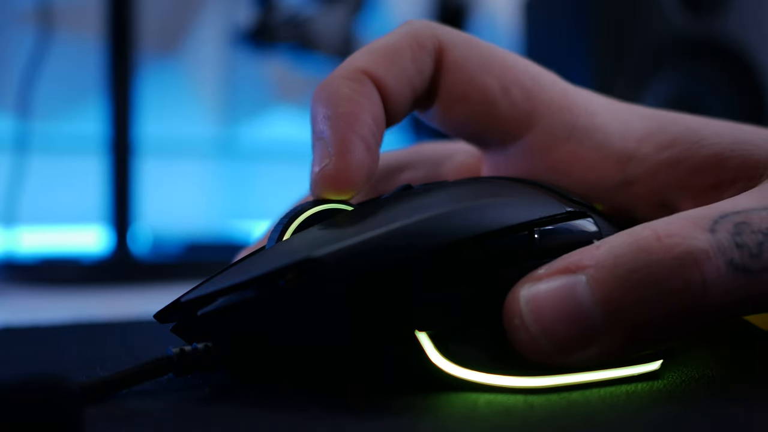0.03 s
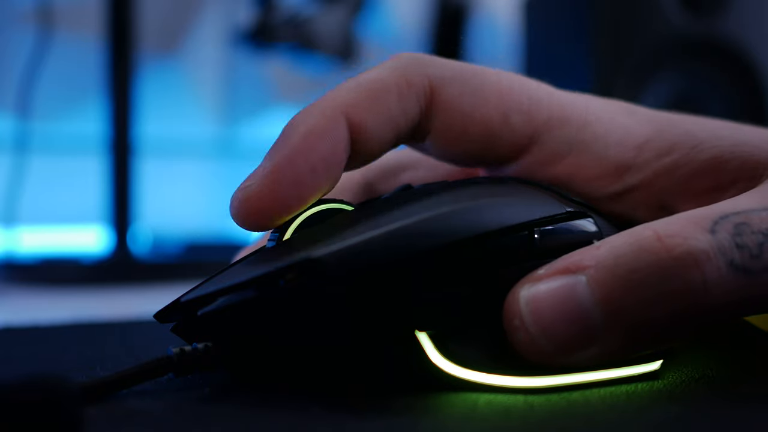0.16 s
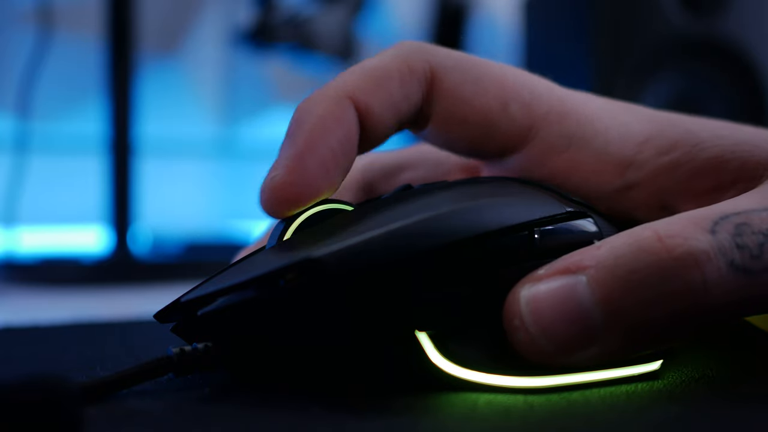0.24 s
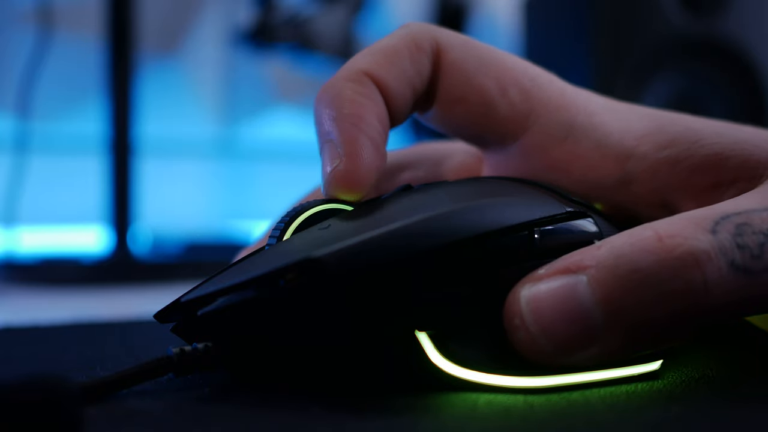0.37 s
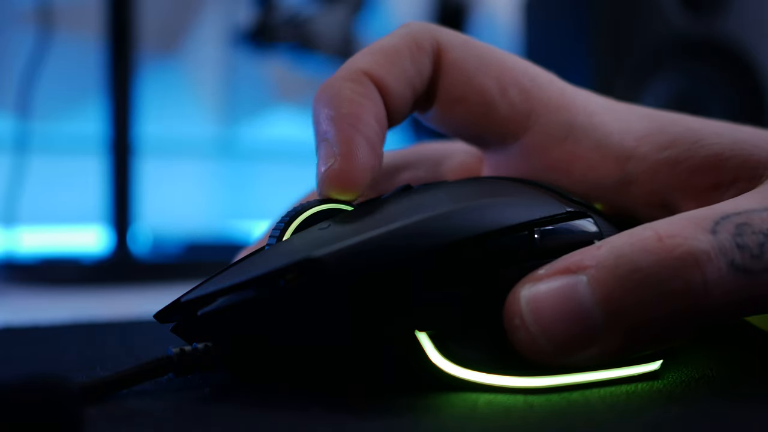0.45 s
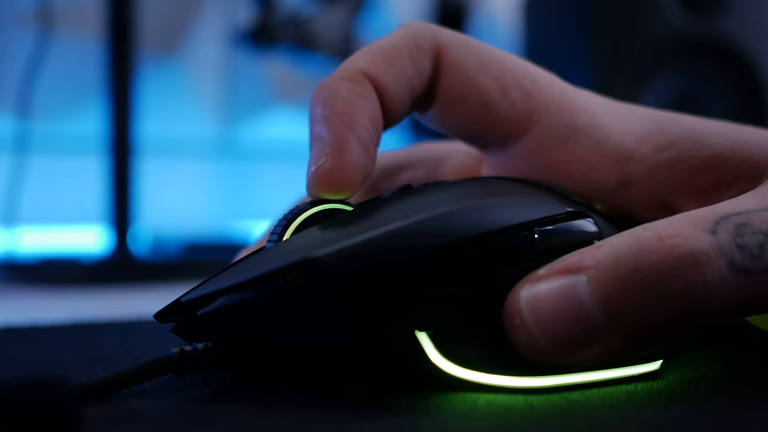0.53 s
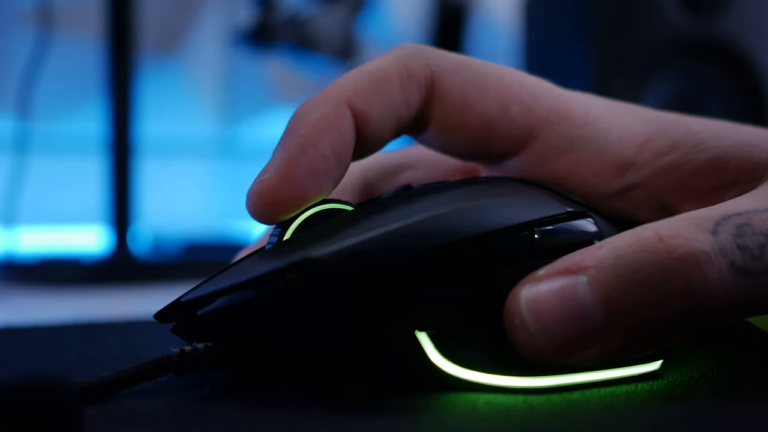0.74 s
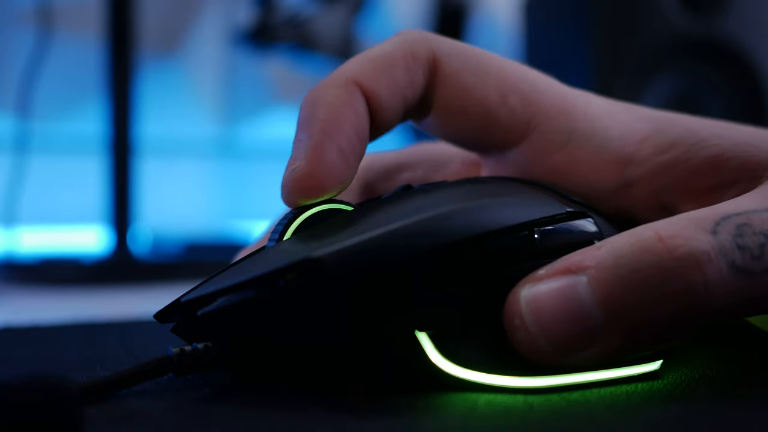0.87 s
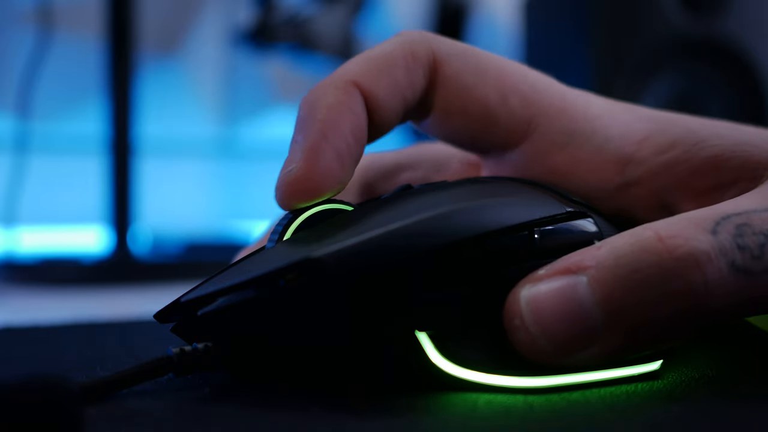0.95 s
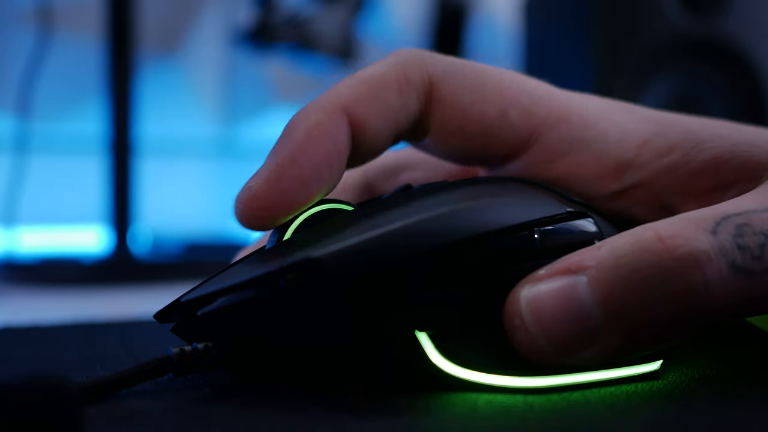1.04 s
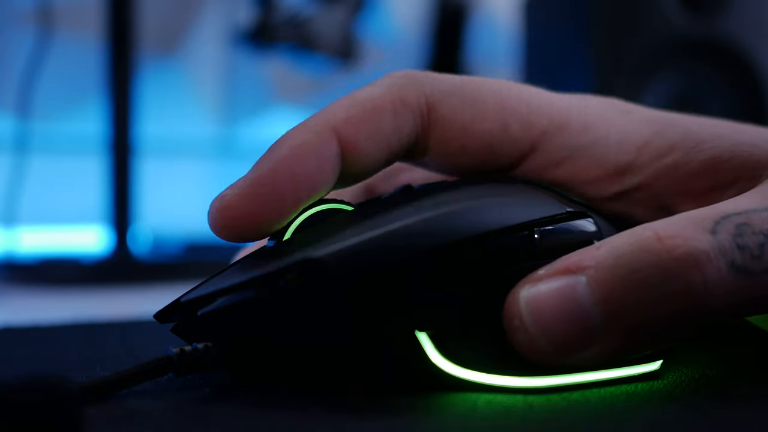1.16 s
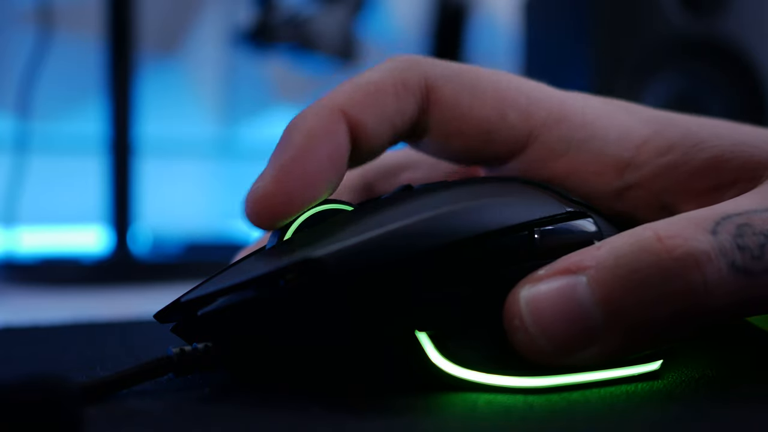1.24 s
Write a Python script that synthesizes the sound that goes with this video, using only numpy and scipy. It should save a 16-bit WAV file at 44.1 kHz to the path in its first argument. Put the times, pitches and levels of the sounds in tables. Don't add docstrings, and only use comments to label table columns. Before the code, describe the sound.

A computer mouse scroll wheel ticks softly, then snaps in one sharp bright click over faint hum

```python
import sys
import numpy as np
from scipy import signal
from scipy.fft import rfft, irfft
from scipy.io import wavfile
from scipy.ndimage import uniform_filter1d

SR = 44100
rng = np.random.default_rng(int(sys.argv[2]) if len(sys.argv) > 2 else 0)


def materialize(psi):
    bounded = np.clip(np.atleast_2d(psi).T, -1, 1)
    quanta = np.round(bounded * 32767).astype(np.int16)
    wavfile.write(sys.argv[1], SR, quanta)


def decibels_to_gain(level_db):
    exponent = np.asarray(level_db, float) / 20
    return 10 ** exponent


N = 57330


def unit(x):
    return x / np.sqrt(np.mean(x ** 2))


def bandpass(x, order, low_hz, high_hz):
    return signal.lfilter(*signal.butter(order, [low_hz, high_hz], "band", fs=SR), x)


def walk(rate_hz):
    k = int(SR / rate_hz)
    return unit(uniform_filter1d(uniform_filter1d(rng.standard_normal(N), k), k))


# frequency_hz, density_db
AIR_SPECTRUM = [(15, -18), (25, -5.5), (212, -3), (2050, -22), (3520, -26.5), (4370, -27), (5000, -27),
                (12900, -28.5), (16000, -31.5)]
AIR_DB = -53


def air():
    hz = np.fft.rfftfreq(N, 1 / SR)
    curve_hz, curve_db = np.array(AIR_SPECTRUM).T
    gain = decibels_to_gain(np.interp(np.log(hz + 1), np.log(curve_hz), curve_db))
    return decibels_to_gain(AIR_DB) * unit(irfft(rfft(rng.standard_normal(N)) * gain, N))


DRONE_HZ, DRONE_WIDTH_HZ, DRONE_DB = 208.6, 30, -55.5


def cavity_drone():
    drone = rng.standard_normal(N)
    for _ in range(2):
        drone = signal.lfilter(*signal.iirpeak(DRONE_HZ, DRONE_HZ / DRONE_WIDTH_HZ, fs=SR), drone)
    return decibels_to_gain(DRONE_DB) * unit(drone)


# multiple, level_db
WHINE_HARMONICS = [(4, -76), (12, -80), (13, -80), (14, -82), (15, -69), (16, -81), (17, -74), (18, -76),
                   (20, -82), (23, -82), (25, -83), (28, -79), (29, -80), (30, -74), (31, -80), (32, -66),
                   (33, -71), (34, -76), (35, -82), (47, -81), (48, -87), (49, -83), (65, -87), (80, -84),
                   (95, -82), (96, -78), (97, -79), (100, -84)]
WHINE_HZ = 400 / 3
WHINE_CHIRP = .3


def electronic_whine():
    t = np.arange(N) / SR
    whine = np.zeros(N)
    for multiple, level_db in WHINE_HARMONICS:
        cycles = multiple * WHINE_HZ * t + WHINE_CHIRP * multiple ** 2
        whine += decibels_to_gain(level_db) * np.sin(2 * np.pi * cycles)
    return np.sqrt(2) * whine


# multiple, level_db
FAN_ORDERS = [(1, -62), (2, -64), (3, -68), (5, -61), (10, -75)]
FAN_HZ, FAN_WOBBLE, FAN_SWAY_DB = 58.7, .008, 4


def fan_hum():
    turn = 2 * np.pi * np.cumsum(FAN_HZ * (1 + FAN_WOBBLE * walk(6))) / SR
    hum = np.zeros(N)
    for order, level_db in FAN_ORDERS:
        hum += decibels_to_gain(level_db + FAN_SWAY_DB * walk(6.3)) * np.sin(round(order) * turn + order)
    return np.sqrt(2) * hum


# start_s, end_s, level_db
ROLLS = [
    (0, 0.037, -45.5),
    (0.064, 0.083, -51.5),
    (0.132, 0.201, -47),
]
ROLL_LOW_HZ, ROLL_TOP_HZ, ROLL_RUMBLE_DB = 555, 3350, 1
ROLL_GRAIN_DB = 2
ROLL_FADE_S = .012


def rolling():
    t = np.arange(N) / SR
    turning = np.zeros(N)
    for start_s, end_s, level_db in ROLLS:
        turning += decibels_to_gain(level_db) * np.clip(np.minimum(t - start_s, end_s - t) / ROLL_FADE_S, 0, 1)
    grit = rng.standard_normal(N) * decibels_to_gain(ROLL_GRAIN_DB * rng.exponential(size=N))
    rub = unit(bandpass(grit, 2, ROLL_LOW_HZ, ROLL_TOP_HZ))
    rumble = unit(bandpass(grit, 2, 60, 220))
    return turning * (rub + decibels_to_gain(ROLL_RUMBLE_DB) * rumble)


ROOM_DB, ROOM_T60_S, ROOM_LAG_S, ROOM_TOP_HZ = -26, .38, .014, 11200


def room(x):
    t = np.arange(N) / SR
    swell = np.clip(t / ROOM_LAG_S, 0, 1) ** 2
    tail = unit(rng.standard_normal(N)) * 1000. ** (-t / ROOM_T60_S) * swell
    tail = bandpass(tail, 1, 900, ROOM_TOP_HZ)
    return decibels_to_gain(ROOM_DB) * signal.fftconvolve(x, tail / np.sqrt(np.sum(tail ** 2)))[:N]


def ring(force, modes, shift, low_hz, top_hz):
    t = np.arange(int(.12 * SR)) / SR
    response = np.zeros(len(t))
    for k, (pitch_hz, level_db, t60_s) in enumerate(modes):
        side_struck = np.sign(shift[-k] - 1)
        decay = 1000. ** (-t / max(t60_s, .0005))
        response += side_struck * decibels_to_gain(level_db) * np.sin(2 * np.pi * pitch_hz * shift[k] * t) * decay
    radiated = signal.butter(2, [low_hz, top_hz], "band", fs=SR, output="sos")
    y = signal.sosfilt(radiated, signal.fftconvolve(force, response))
    return y / np.sqrt(np.max(uniform_filter1d(y ** 2, size=32)))


def add(out, x, start_s):
    i = max(int(start_s * SR), 0)
    out[i:i + len(x)] += x[:N - i]


# pitch_hz, level_db, t60_s
SHELL_MODES = [(560, -9, .012), (680, -7, .015), (810, -5, .018), (1000, -7, .01), (1200, -4, .01),
               (1430, -1, .01), (1680, -2, .008), (2200, -7, .005)]
# pitch_hz, level_db, t60_s
DESK_MODES = [(65, -6, .07), (130, -3, .05), (210, 0, .04), (330, -6, .025), (450, -10, .02)]
SHELL_LAG_S = .0002
RISE_SHARE = .15
DETUNE, IMPACT_SPREAD_DB = .02, 2.5
CONTACT_TRIM_DB = .1


def contacts(table, parts, shell_low_hz):
    out = np.zeros(N)
    size = 1400
    for start_s, chatter_s, crackle_db, shell_db, thud_db in table:
        x = np.arange(size) / SR / chatter_s
        push = np.clip(x / RISE_SHARE, 0, 1) * np.exp(-x ** 3)
        chance = rng.standard_normal(size)
        force = chance * decibels_to_gain(IMPACT_SPREAD_DB * rng.exponential(size=size)) * push
        shift = 1 + DETUNE * chance[::-1]
        crackle = ring(force, parts, shift, low_hz=1890, top_hz=14500)
        shell = ring(force, SHELL_MODES, shift[20:], low_hz=shell_low_hz, top_hz=2800)
        thud = ring(push, DESK_MODES, shift[40:], low_hz=46.2, top_hz=490)
        add(out, decibels_to_gain(crackle_db + CONTACT_TRIM_DB) * crackle, start_s)
        add(out, decibels_to_gain(shell_db + CONTACT_TRIM_DB) * shell, start_s + SHELL_LAG_S)
        add(out, decibels_to_gain(thud_db + CONTACT_TRIM_DB) * thud, start_s)
    return out


# start_s, chatter_s, crackle_db, shell_db, thud_db
TICKS = [(.0001, .001, -50, -34, -42), (.0034, .0015, -32, -29, -46), (.0215, .003, -54, -36, -40),
         (.0271, .0014, -34, -29, -48), (.0713, .0015, -60, -39, -36), (.0755, .003, -62, -41, -40),
         (.1418, .0016, -30, -28, -44), (.1555, .0017, -29, -32, -42), (.1592, .002, -50, -33, -44),
         (.1698, .0021, -30, -32, -40), (.1738, .0025, -50, -34, -42), (.1878, .0022, -29, -32, -44),
         (.2995, .002, -38, -45, -60), (.3020, .006, -47, -54, -62), (.3055, .002, -43, -54, -62),
         (.3086, .0007, -32, -46, -60), (.3098, .0032, -36, -48, -60), (.3130, .018, -49, -60, -64)]
# pitch_hz, level_db, t60_s
WHEEL_MODES = [(2600, -2, .002), (3300, -2, .002), (4200, -1, .002), (5000, -1, .0015), (6300, 1, .0012),
               (7500, -1, .0012), (9300, -3, .001), (11200, 0, .0012), (12700, -1, .0012),
               (14300, -5, .001)]


def wheel_ticks():
    return contacts(TICKS, WHEEL_MODES, shell_low_hz=486)


# start_s, chatter_s, crackle_db, shell_db, thud_db
SWITCH = [
    (.2006, .002, -33, -42, -52),
    (.2020, .002, -23, -34, -48),
    (.2035, .004, -25, -33, -46),
    (.2066, .003, -20, -34, -46),
    (.2095, .0012, -6, -28, -44),
    (.2108, .0006, -12, -34, -46),
    (.2116, .0045, -24, -38, -46),
    (.2158, .0005, -15, -38, -44),
    (.2165, .002, -24, -36, -46),
    (.2174, .0022, -30, -31, -42),
]
# pitch_hz, level_db, t60_s
LEAF_MODES = [(2200, -8, .002), (3000, -7, .002), (4100, -7, .002), (5300, -5, .002), (6400, -7, .0015),
              (8200, -9, .0012), (10000, -7, .0012), (11400, -3, .0015), (12500, 1, .002),
              (13200, -1, .002), (14600, -10, .001)]


def switch_snap():
    return contacts(SWITCH, LEAF_MODES, shell_low_hz=1190)


SIDE_DB = -31
SIDE_HIGH_DB, SIDE_HZ = -13, 3080


def scene():
    mouse = wheel_ticks() + switch_snap()
    floor = air() + cavity_drone() + electronic_whine() + fan_hum() + rolling()
    mid = mouse + room(mouse) + floor
    flicker = walk(200)
    hiss = signal.lfilter(*signal.butter(1, SIDE_HZ, "high", fs=SR), floor * flicker)
    side = decibels_to_gain(SIDE_DB) * mid * flicker + decibels_to_gain(SIDE_HIGH_DB) * hiss
    return np.array([mid + side, mid - side])


def band_limit(x):
    return signal.sosfilt(signal.butter(12, 16400, fs=SR, output="sos"), x)


TOP_HZ = 15600


def record(dry):
    dry = signal.sosfilt(signal.ellip(8, .2, 70, TOP_HZ, fs=SR, output="sos"), dry)
    return band_limit(np.clip(dry, -1, 1))


dry = scene()
out = record(dry)
materialize(out)
```